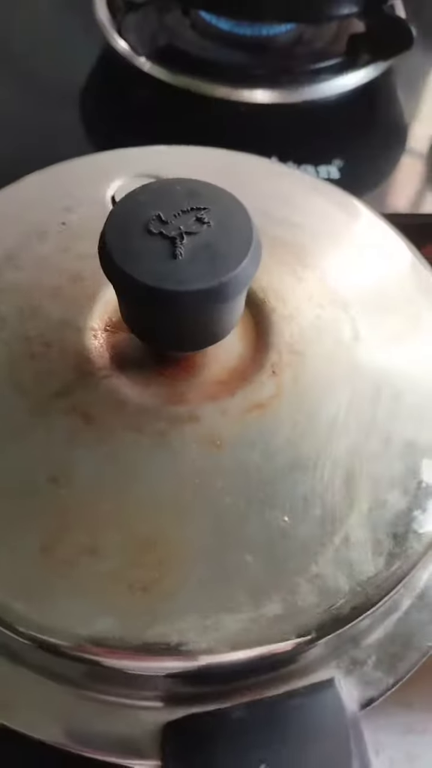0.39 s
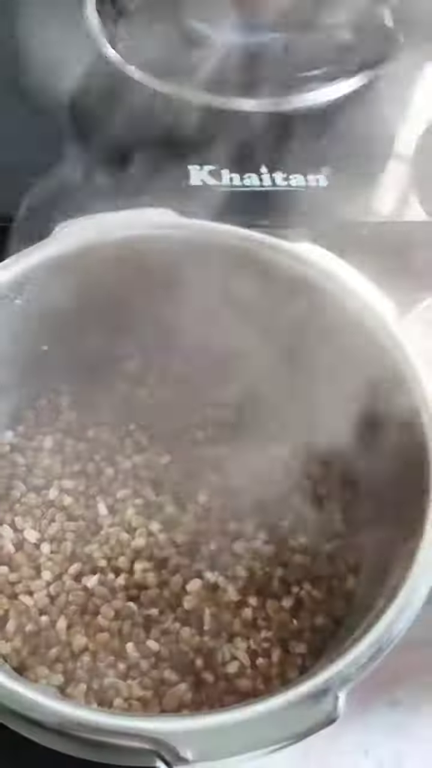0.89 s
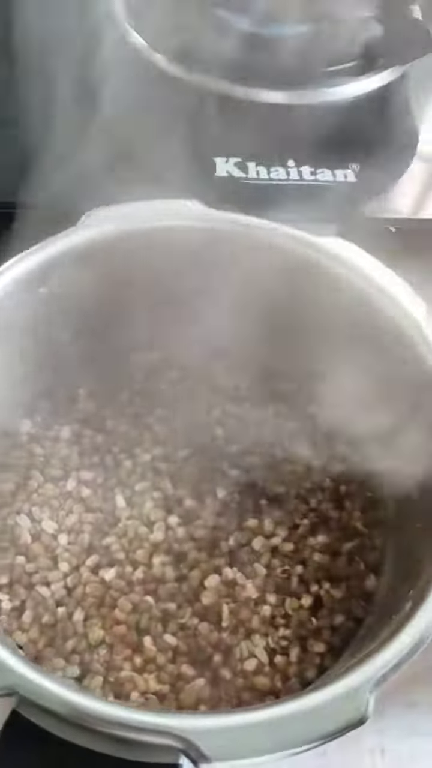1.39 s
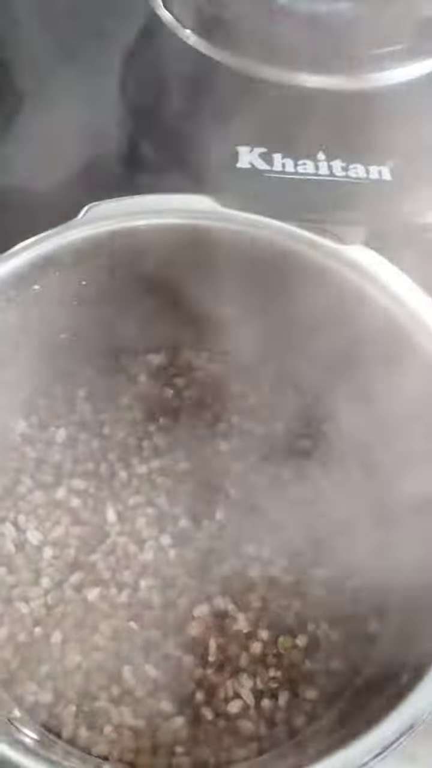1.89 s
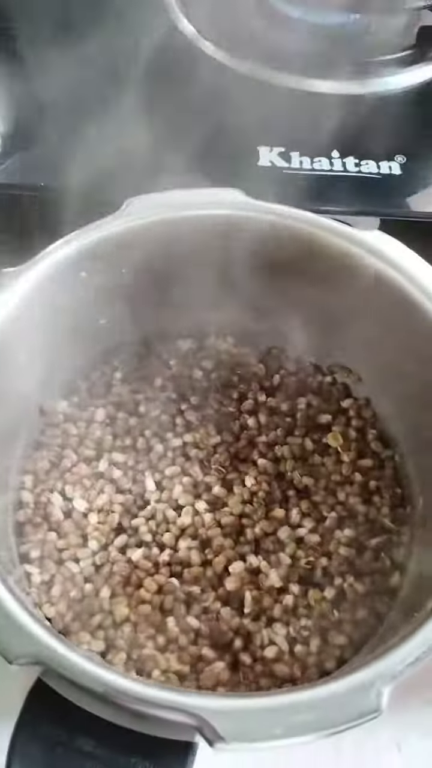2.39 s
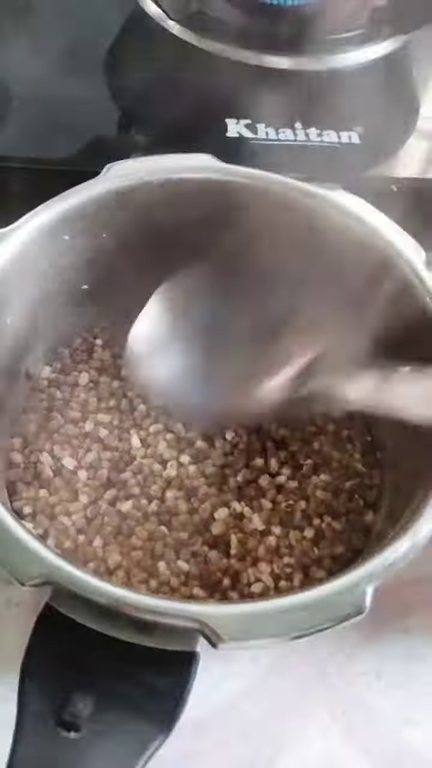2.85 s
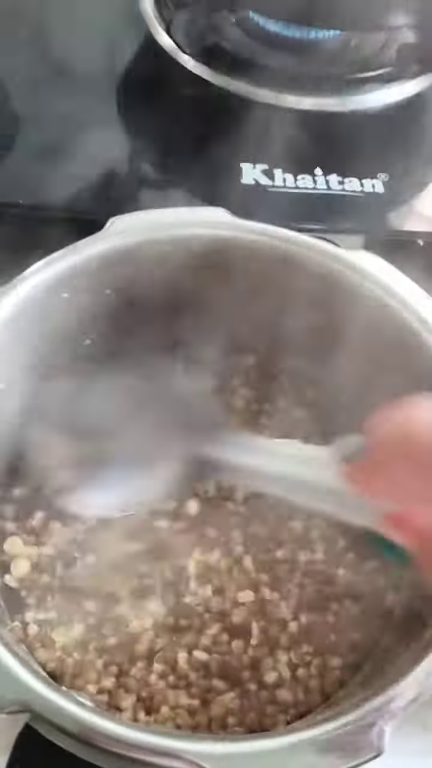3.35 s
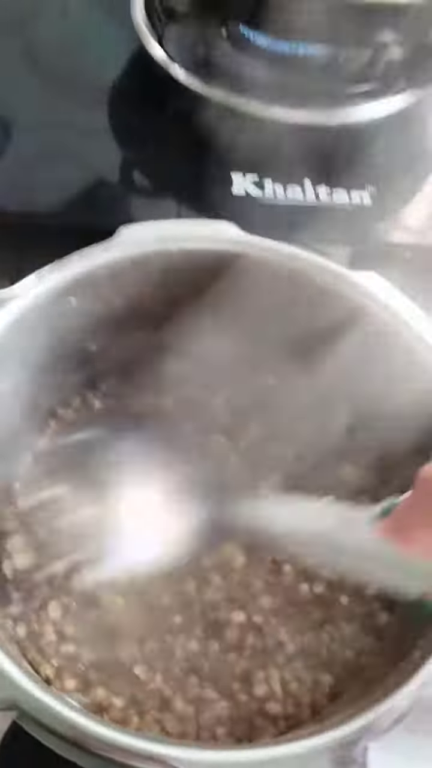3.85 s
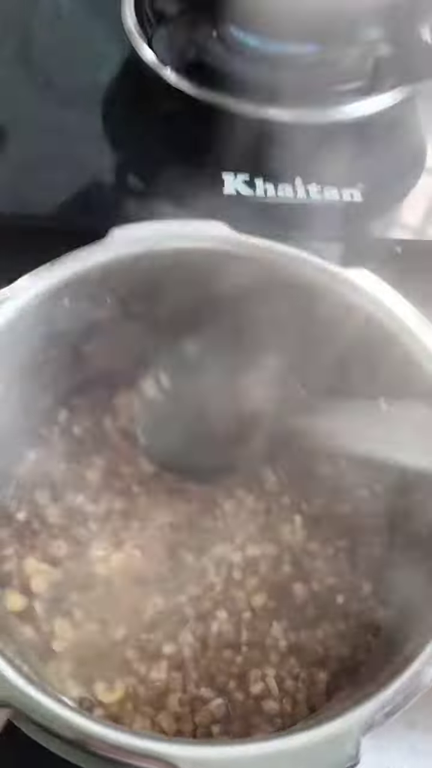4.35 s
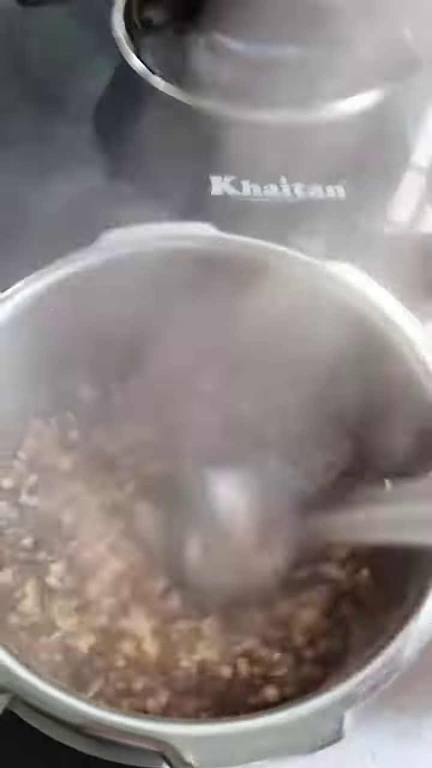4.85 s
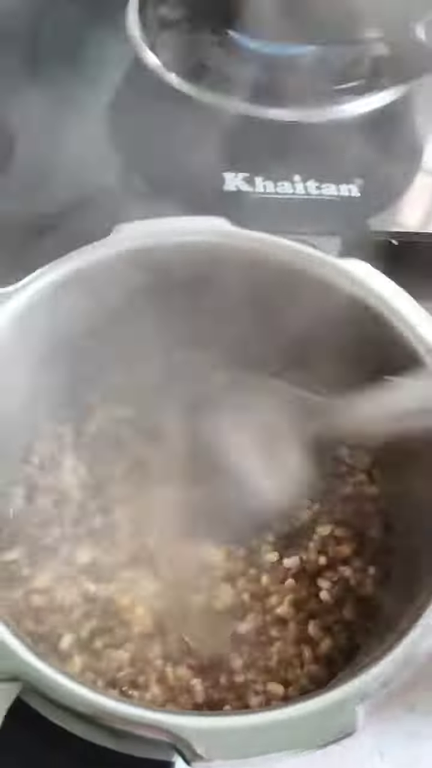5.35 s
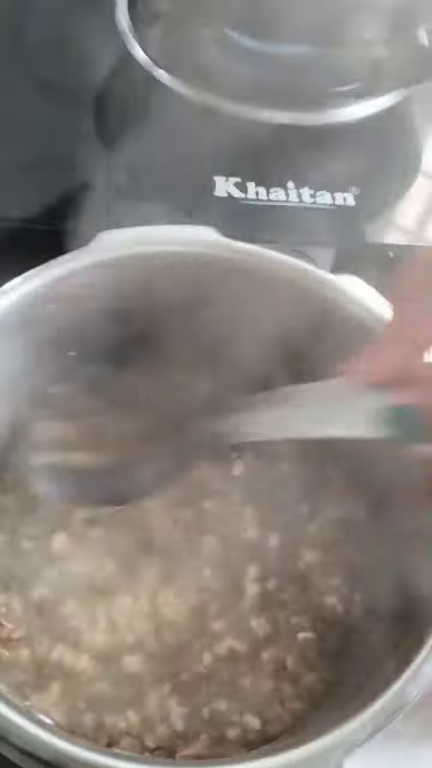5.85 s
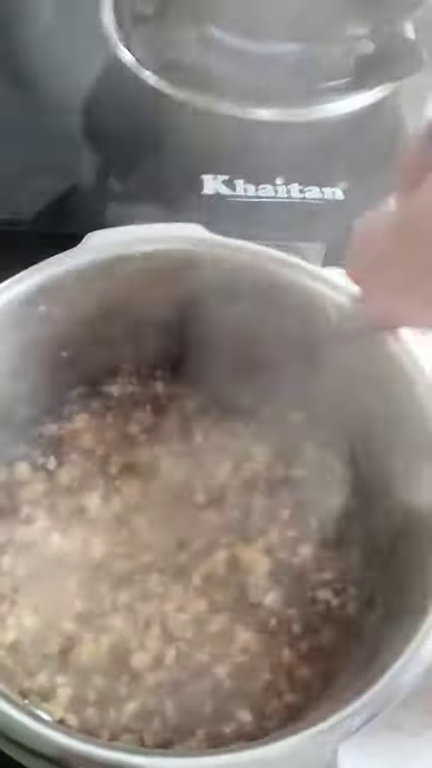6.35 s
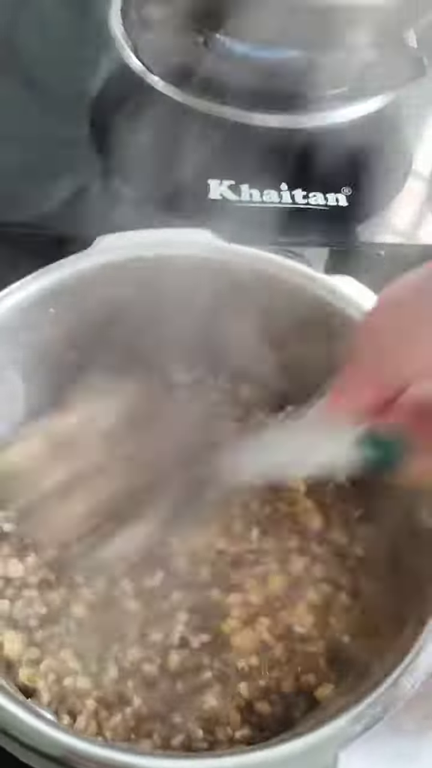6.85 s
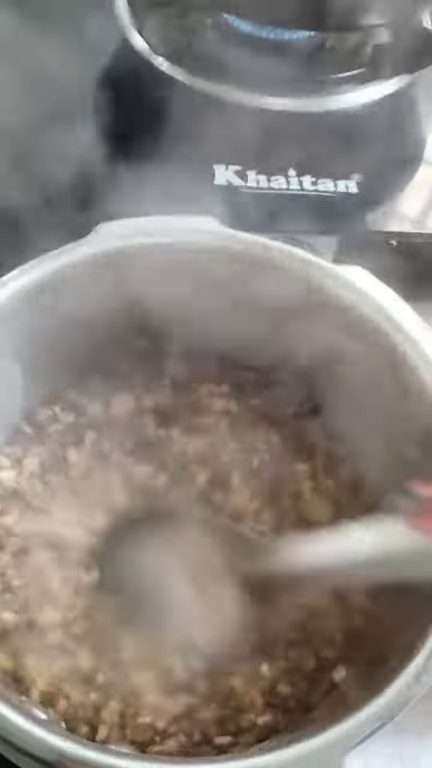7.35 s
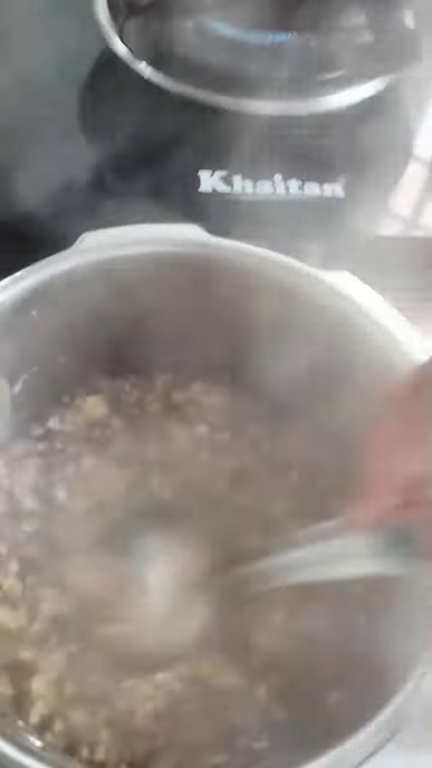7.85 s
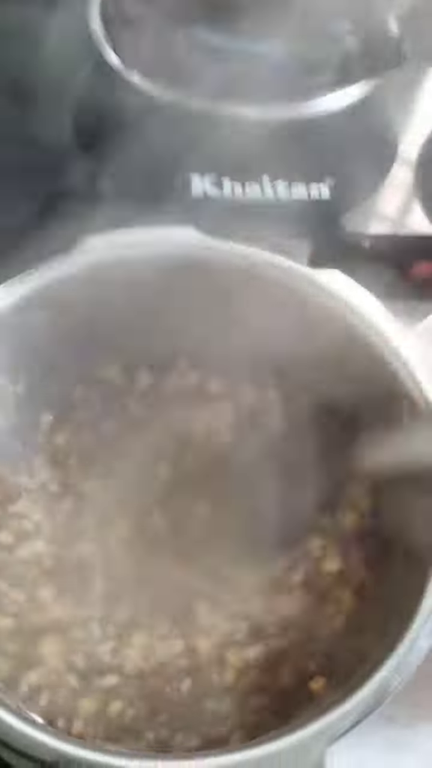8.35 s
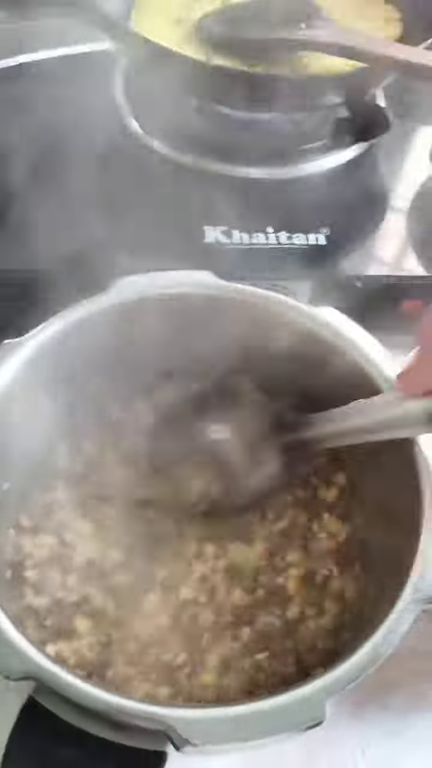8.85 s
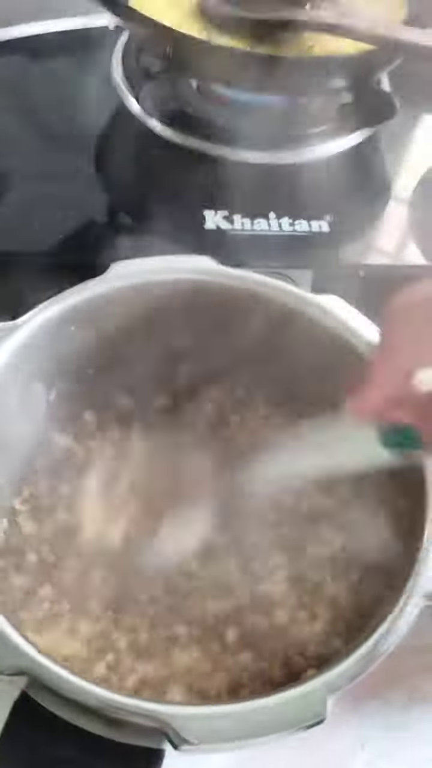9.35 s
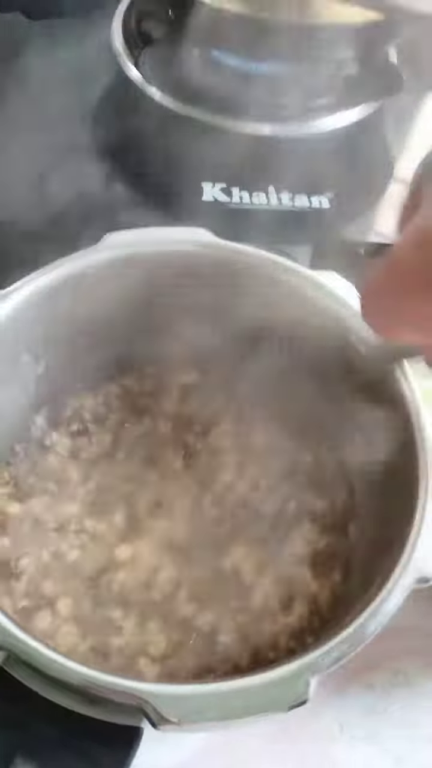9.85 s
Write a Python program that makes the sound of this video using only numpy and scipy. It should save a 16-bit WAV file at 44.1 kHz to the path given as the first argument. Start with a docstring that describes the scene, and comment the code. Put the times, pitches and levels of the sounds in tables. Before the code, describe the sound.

A short thin steam jet stops almost at once, followed by dull bumps and a bright clatter of a steel lid being unlocked, lifted and put down. Then a ladle stirs beans, striking the pot wall in irregular short metallic knocks, with tiny ticks between. Close microphone in a small kitchen, with soft steam hiss and low burner rumble behind.

```python
"""Pressure cooker of beans, opened and stirred

A steam jet, as banded noise, vents briefly from a cooker; its steel lid is unlocked, lifted and set down with clanks.
Then a steel ladle stirs hot beans and knocks on the pot wall: each blow is briefly ringing modes over noise clatter.
Scrapes, ticks and dull bumps are short shaped noises, the bumps with a low swing. Behind them lie the roar,
scrape and hiss of the kitchen as drifting coloured noise, and the rumble of burners with one deep tone."""
import sys
import numpy as np
from scipy import signal
from scipy.fft import rfft, irfft
from scipy.io import wavfile
from scipy.ndimage import uniform_filter1d

SR = 44100
rng = np.random.default_rng(int(sys.argv[2]) if len(sys.argv) > 2 else 0)


def persist_wave(psi):
    """Save psi, clipped to +-1, as 16-bit WAV."""
    counts = np.round(np.clip(psi, -1, 1) * 32767).astype(np.int16)
    wavfile.write(sys.argv[1], SR, np.atleast_2d(counts).T)


def convert_level_to_amplitude(level_db):
    """Map a level in decibels to its linear amplitude factor."""
    exponent = np.asarray(level_db, float) / 20
    return 10 ** exponent


N = 440118

# Modes of the lid. Each row: frequency in Hz, relative level in dB, t60 in s before capping and scaling per blow.
LID_MODES = [(807, -20, 5.0), (1270, -7, 0.072), (1685, -14, 0.073), (2159, -25, 0.092), (2982, -28, 0.21),
             (3359, -20, 0.13), (3892, -25, 0.11), (4161, -17, 0.081), (4544, -25, 0.2), (5620, -30, 0.1),
             (6535, -20, 0.066), (7036, -9, 0.058), (7843, -18, 0.11), (8463, -20, 0.054),
             (8899, -22, 0.074), (9200, -25, 0.072), (9873, -10, 0.053), (10010, -8, 0.05),
             (10540, -16, 0.061), (10860, 0, 0.021), (11260, -15, 0.018), (11690, -25, 0.07),
             (11950, -15, 0.046), (12280, -20, 0.084), (12380, -21, 0.075), (12730, -20, 0.085)]
# Spectrum of the lid's clatter. Each row: frequency in Hz, relative density in dB.
LID_CLATTER = [(88, -41.5), (150, -14), (459, -11), (757, -0.5), (1300, -3.5), (2310, -10), (3400, -16),
               (5950, -16), (6810, -9), (8920, -14), (10200, -28), (14200, -15.5), (15000, -39)]
# Body, middle, treble. Each row: centre in Hz, t60 of the clatter in s before scaling per blow.
BANDS = [(900, 0.04), (3500, 0.027), (9000, 0.032)]


def unit_rms(x):
    return x / np.sqrt(np.mean(x ** 2) + 1e-20)


def read_curve(points, hz):
    """Interpolates a curve over log frequency."""
    f, value = np.transpose(points)
    return np.interp(np.log(hz + 1), np.log(f + 1), value)


def band_share(hz, band):
    """Gain of one of the three overlapping bands at each frequency."""
    corners = [(f, float(k == band)) for k, (f, _) in enumerate(BANDS)]
    return read_curve(corners, hz) ** 1.717


def coloured(noise, gain):
    """Noise filtered by a gain per FFT bin, at unit rms."""
    return unit_rms(irfft(rfft(noise) * gain, len(noise)))


def add(mix, start_s, sound):
    part = mix[round(start_s * SR):][:len(sound)]
    part += sound[:len(part)]


def struck_steel(rows, modes, clatter, decay_scale, ring_db, ring_per_hard, rise_s, crack_db,
                 upper_ring_db, twin_db, favour_db, spot_db, gather_db):
    """Each blow rings the modes, unevenly by where it lands, over a crack and a clatter of unresolved modes."""
    longest_t60_s = 0.075  # hand and food damp longer rings; capped ahead of the scaling per blow
    longer_per_db = 0.012  # louder blows ring longer
    out, t, bins = np.zeros(N), np.arange(6144) / SR, np.fft.rfftfreq(6144, 1 / SR)
    hz, mode_db, t60_s = np.transpose(modes)[:, :, None]
    rise = 1 - np.exp(-t / rise_s)
    crack = convert_level_to_amplitude(crack_db - 60 * t / 0.01)
    high_pass = bins ** 2 / (bins ** 2 + 147.0 ** 2)
    for s, db, body_db, treble_db, best_hz in rows:
        scale = decay_scale * np.exp(longer_per_db * (db + 27))
        place = rng.standard_normal((3, len(modes), 1))
        noise = rng.standard_normal(len(t))

        # an uneven vessel splits each mode in two
        phase = 2 * np.pi * hz * (1 + 0.0073 * place[1]) * t
        pair = np.sin(phase) + convert_level_to_amplitude(twin_db) * np.sin(phase * (1 + 0.018 * place[2]))
        place_db = 3.5 * place[0]
        place_db += favour_db * np.exp(-(np.log2(hz / best_hz) / 0.045) ** 2)
        ring_t60_s = np.minimum(t60_s, longest_t60_s) * np.sqrt(scale)
        ring = convert_level_to_amplitude(mode_db + place_db - 60 * t / ring_t60_s) * pair

        # clatter gathers round the modes and the spot's best frequency
        spot = spot_db * np.exp(-(np.log2((bins + 1) / best_hz) / 0.04) ** 2)
        near_modes = convert_level_to_amplitude(0.5 * (mode_db + place_db)) / (1 + ((bins - hz) / (0.011 * hz)) ** 2)
        colour = convert_level_to_amplitude(read_curve(clatter, bins) + spot)
        colour *= (1 + convert_level_to_amplitude(gather_db) * near_modes.sum(0)) * high_pass

        tones = [(body_db, 0), (0, upper_ring_db), (treble_db, upper_ring_db)]
        for band, (band_db, tone_db) in enumerate(tones):
            dense = coloured(noise, colour * band_share(bins, band))
            dense *= crack + convert_level_to_amplitude(-60 * t / (BANDS[band][1] * scale))
            lines = (band_share(hz, band) * ring).sum(0)
            lines_gain = convert_level_to_amplitude(ring_db + ring_per_hard * treble_db + tone_db)
            part = rise * (dense + lines_gain * lines / np.std(lines[:200]))
            add(out, s - rise_s, convert_level_to_amplitude(db + band_db) * part / np.std(part[:200]))
    return out


def lid():
    """Lid against rim and counter: the treble of hard blows rings much more, over a strong crack."""
    # Each row: time in s, onset level of the middle band in dB, body re middle in dB (weight),
    # treble re middle in dB (hardness), frequency that this spot rings best in Hz.
    blows = [(0.7869, -25.5, -5.5, -7.5, 4530), (0.8039, -38.5, 8, -16, 1990), (1.405, -40.5, -2, -5, 4200),
             (1.4105, -40.5, 5, 7, 7700), (1.4144, -28.5, 7.5, 1.5, 7460), (1.4224, -39, 3, -6, 4200),
             (1.713, -33, 10.5, -20, 1850), (1.8104, -30, 2.5, 8, 2720), (1.8159, -19, 3, 8, 10160),
             (1.8294, -28, 5.5, -2, 7300), (1.902, -39.5, 14.5, 6.5, 7850),
             (2.0036, -22.5, -3, -11.5, 3080), (2.023, -42.5, 15, -20, 2560), (2.3725, -51, 4, -12, 2340),
             (2.4377, -30.5, -5.5, 11.5, 8060), (2.4441, -31, -17, 6, 10100), (2.5014, -36, -4.5, 10, 8030),
             (2.5425, -34, 3.5, -9, 2240)]
    return struck_steel(blows, LID_MODES, LID_CLATTER, decay_scale=1.9, ring_db=-14.5, ring_per_hard=0.7,
                        rise_s=0.00073, crack_db=10.0, upper_ring_db=2.0, twin_db=6.0, favour_db=4.0,
                        spot_db=12.5, gather_db=20.0)


def ladle():
    """Ladle against the pot wall: stronger modes than the lid's over a weaker crack."""
    # Each row: time in s, onset level of the middle band in dB, body re middle in dB (weight),
    # treble re middle in dB (hardness), frequency that this spot rings best in Hz.
    blows = [(3.4665, -24, 2.5, 0.5, 4460), (3.6302, -28.5, 7.5, -3.5, 1850),
             (3.9768, -14.5, -3.5, -3, 5400), (4.0347, -52.5, 8, -6, 2090), (4.2999, -25.5, 1.5, 7, 4120),
             (4.4511, -32, 6.5, -8, 1760), (5.301, -17, 3.5, -0.5, 1130), (5.939, -25, -0.5, -3, 5230),
             (6.1151, -19.5, -4.5, 2.5, 1930), (6.3882, -26.5, 2.5, -9.5, 5300),
             (7.0881, -24, -3.5, 0, 5270), (7.3972, -46.5, -28, 9.5, 5200), (7.4074, -36.5, -2, 6, 8400),
             (7.6923, -16.5, 2, 2, 5730), (7.7214, -34.5, -5, -2, 4140), (7.877, -34, -17, -5.5, 2230),
             (8.0133, -32, 8.5, -3.5, 5470), (8.0928, -38, -2.5, -1, 2580), (8.6493, -20, -12, -2.5, 4970),
             (8.8057, -55.5, -20, 19, 8100), (8.9628, -57, -20, 17.5, 12000), (8.9883, -47, 0, 5, 2040),
             (9.7599, -20.5, -7, -4.5, 4430), (9.7784, -45.5, -14, 2, 3240), (9.9408, -47.5, -3, 2, 4200)]
    # Each row: frequency in Hz, relative level in dB, t60 in s before capping and scaling per blow.
    pot_modes = [(398, -15, 0.088), (738, -20, 0.087), (1130, 0, 0.07), (1567, -17, 0.072),
                 (1760, -17, 0.069), (1938, -13, 0.055), (2579, -19, 0.058), (3219, -17, 0.1),
                 (3736, -23, 0.099), (4597, -9, 0.059), (4974, -4, 0.032), (5152, -7, 0.043),
                 (5620, -22, 0.048), (5895, -18, 0.041), (6401, -13, 0.044), (6578, -12, 0.053),
                 (7316, -13, 0.035), (7870, -14, 0.056), (8716, -5, 0.031), (8995, -23, 0.16),
                 (10210, -23, 0.071), (11120, -29, 0.089), (12140, -26, 0.042)]
    # Each row: frequency in Hz, relative density in dB.
    pot_clatter = [(88, -51), (150, -18), (728, -11.5), (1110, -8.5), (1700, -16), (2230, -4.5),
                   (2650, -14), (3270, -14.5), (5200, -15), (5720, -12), (8580, -4.5), (13400, -16.5),
                   (15000, -37)]
    return struck_steel(blows, pot_modes, pot_clatter, decay_scale=1.26, ring_db=-2.5, ring_per_hard=0.05,
                        rise_s=0.0006, crack_db=1.5, upper_ring_db=-3.0, twin_db=-2.0, favour_db=10.5,
                        spot_db=9.5, gather_db=13.0)


def scrapes():
    """Rubbing contact: tapered noise of rough level, for dense tiny impacts, in the colour of the lid's steel."""
    # Lid dragged on the rim, ladle pushed through beans. Each row: start in s, length in s,
    # rms before the taper in dB, tilt in dB per octave.
    rubs = [(0.792, 0.043, -35.5, -6), (1.168, 0.12, -48, 5), (1.391, 0.022, -47, -6.5),
            (1.427, 0.062, -41, -4), (1.715, 0.041, -35, -6), (1.817, 0.072, -33.5, -3.5),
            (1.861, 0.075, -37.5, -6.5), (2.007, 0.036, -39, -6.5), (2.361, 0.052, -42, -5),
            (6.571, 0.12, -52, -5), (8.546, 0.038, -53, -2.5), (8.268, 0.11, -53, 10)]
    out = np.zeros(N)
    for s, length_s, db, tilt_db in rubs:
        count = round(length_s * SR)
        bins = np.fft.rfftfreq(count, 1 / SR) + 1
        roughness = unit_rms(uniform_filter1d(rng.standard_normal(count), size=150))
        impacts = rng.standard_normal(count) * convert_level_to_amplitude(2.2 * roughness)
        colour = convert_level_to_amplitude(read_curve(LID_CLATTER, bins) + tilt_db * np.log2(bins / 1000))
        # broad peaks at the modes
        colour *= 1 + 0.83 * sum(1 / (1 + ((bins - hz) / (0.075 * hz)) ** 2) for hz, _, _ in LID_MODES)
        add(out, s, convert_level_to_amplitude(db) * coloured(impacts, colour) * signal.windows.tukey(count, 0.6))
    return out


def vent():
    """Steam jet past the weight: noise in a few whistling bands, fluttering until it stops."""
    # Each row: centre in Hz, -3 dB width in Hz (below 250 counts as 250), relative level in dB.
    whistles = [(7400, 230, 9), (7890, 32, 12), (9180, 130, -4), (11100, 98, -1), (13200, 180, 9)]
    level_db, end_s = -49.5, 0.243
    count = round(end_s * SR)
    hz = np.fft.rfftfreq(count, 1 / SR)
    peaks = sum(convert_level_to_amplitude(db) / np.sqrt(1 + (2 * (hz - f) / max(width, 250)) ** 2) for f, width, db in whistles)
    high_pass = hz ** 4 / (hz ** 4 + 3200.0 ** 4)
    flutter = convert_level_to_amplitude(1.3 * unit_rms(uniform_filter1d(rng.standard_normal(count), size=600)))
    jet = coloured(rng.standard_normal(count), peaks * high_pass) * flutter
    return np.pad(convert_level_to_amplitude(level_db) * jet, (0, N - count))


def ticks():
    """Droplets, beans and light touches of steel: a dry noise spike with a faint, unpitched tail."""
    # Each row: time in s, level in dB, spectral width (standard deviation) in octaves.
    clear = [(0.0276, -24, .54), (0.042, -31, 1.1), (0.8768, -30, 1.2), (0.976, -31, 0.69),
             (0.983, -27, 1.2), (0.99, -30, 1.7), (1.043, -25.5, 0.21), (1.05, -32, .53),
             (1.186, -30.5, 1.1), (1.1957, -32, 0.6), (1.239, -22.5, 1.25), (1.2604, -28, 0.5),
             (1.693, -32, 2.2), (2.6888, -34.5, 0.6), (3.123, -34.5, .67), (3.328, -35.5, 2.3),
             (3.514, -25.5, 0.48), (3.726, -34, 0.39), (3.968, -34, .8), (3.822, -26, 1.2),
             (4.151, -34, 1.1), (4.198, -30.5, 1.3), (4.6424, -26.5, 3), (4.8258, -23, 1.45),
             (4.985, -32, 0.91), (5.1464, -35.5, 3.1), (5.267, -37, 0.75), (5.4414, -19.5, 0.49),
             (5.594, -27, .37), (5.6355, -31, 1.2), (5.7987, -28, 0.66), (6.273, -34.5, 2),
             (6.557, -28, 1.5), (6.5827, -30.5, 0.38), (6.656, -34, 1.1), (6.957, -33.5, 1),
             (7.2496, -26, 2.6), (7.8125, -33, 0.42), (7.939, -24.5, 0.56), (8.175, -33, 0.98),
             (8.298, -28.5, 0.75), (8.31, -33, 1), (8.337, -19, 0.55), (8.7186, -31.5, .88),
             (9.4537, -23, 0.69)]
    centre_hz, centre_scatter, tail_t60_s = 9200, 0.024, 0.035
    faint_count, faint_db, faint_octaves = 16, -41.5, 1.4  # at random moments, up to 4 dB above faint_db
    out, t = np.zeros(N), np.arange(4096) / SR
    bins = np.fft.rfftfreq(len(t), 1 / SR) + 1
    low_pass = 1 / np.sqrt(1 + (bins / 10500) ** 6)
    spike, tail = convert_level_to_amplitude(-60 * t / 0.0037), convert_level_to_amplitude(-14.5 - 60 * t / tail_t60_s)
    shape = (spike + tail) * (1 - np.exp(-t / 0.00082))
    faint = [(u * N / SR, faint_db + 4 * v, faint_octaves) for u, v in rng.random((faint_count, 2))]
    for s, db, octaves in clear + faint:
        hz = centre_hz * (1 + centre_scatter * rng.standard_normal())
        hump = np.exp(-0.5 * (np.log2(bins / hz) / octaves) ** 2)
        snap = coloured(rng.standard_normal(len(t)), hump * low_pass)
        add(out, max(s - 0.0006, 0), convert_level_to_amplitude(db) * shape * snap)
    return out


def bumps():
    """Dull bumps through stove and counter: a low damped swing with a short, dull noise rustle."""
    # Each row: time in s, level in dB, frequency in Hz, t60 in s, rustle re swing in dB.
    thuds = [(0.524, -34.5, 288, 0.052, -1.5), (0.574, -40, 410, 0.057, -2.5), (0.612, -44, 127, 0.067, 1),
             (0.628, -33, 244, 0.072, -2), (1.413, -26, 118, 0.13, -10), (1.449, -28, 102, 0.074, 0.5),
             (2.371, -34, 370, 0.087, 4.5), (3.165, -38.5, 87.5, 0.11, -10),
             (4.273, -28.5, 137, 0.064, -17), (6.175, -17.5, 133, 0.1, -2), (6.3, -36, 148, 0.061, -1),
             (6.486, -41, 316, 0.045, 8), (6.565, -44.5, 191, 0.13, 4.5), (7.675, -46, 460, 0.068, 2),
             (9.677, -35.5, 160, 0.059, 0.5)]
    out, t = np.zeros(N), np.arange(8192) / SR
    low_pass = 1 / (1 + (np.fft.rfftfreq(len(t), 1 / SR) / 900) ** 3.03)
    for s, db, hz, t60_s, rustle_db in thuds:
        rustle = convert_level_to_amplitude(rustle_db - 60 * t / 0.4) * coloured(rng.standard_normal(len(t)), low_pass)
        swing = np.sin(2 * np.pi * hz * t)
        shape = convert_level_to_amplitude(db - 60 * t / t60_s) * (1 - np.exp(-t / 0.0025))
        add(out, s - 0.002, shape * (swing + rustle))
    return out


def kitchen():
    """Roar, scrape and hiss share one noise spectrum and swell apart, roughened by patches and droplet bursts."""
    # Each row: time in s, bustle of lid and ladle in dB, steam rising from the pot in dB.
    activity = [(0.0, -1.5, 3), (0.08, -1.5, 7), (0.3, -1.5, 2), (0.83, 2.5, -2), (1.1, -1, 1),
                (1.7, 1.5, -1), (1.89, 7, -2), (2.05, 0, 3), (2.75, 0, -1), (4.399, 0.7, -1), (5.2, -.5, 0),
                (5.39, 1.5, 0.3), (5.9, 0.5, -2.5), (6.48, 2.5, 2.5), (6.899, -0.5, -2), (7.9, 0.8, 1),
                (8.1, -1.5, 0), (8.7, 1.5, 0.1), (9.8, -0.9, 0.2), (9.98, 3, 4)]
    # Each row: frequency in Hz, relative density in dB.
    air = [(120, -49.5), (200, 4), (309, -8.5), (370, -6.5), (419, -9.5), (494, -3.5), (602, -13),
           (998, -9.5), (1410, -11), (1600, -12.5), (3010, -24), (5660, -21), (8410, -13), (13700, -27.5),
           (15000, -37.5)]
    # Roar, scrape, hiss. Each row: resting level in dB, share of the bustle, share of the steam.
    layers = [(-55.5, .99, 0.01), (-67, 0.69, .3), (-61, .1, .99)]
    swell_db = 0.97  # rms of each layer's chance drift
    frames, hz = N // 128 + 5, np.fft.rfftfreq(512, 1 / SR)
    real, imag, patches = rng.standard_normal((frames, len(hz), 3)).T
    patches = unit_rms(uniform_filter1d(uniform_filter1d(patches, size=8, axis=0), size=14, axis=1))
    bursts = np.minimum(rng.exponential(1, frames), 4) * (rng.random(frames) < 0.06)  # droplets
    # beans shifting in clumps
    rolls = unit_rms(uniform_filter1d(np.minimum(rng.exponential(1, frames), 3) ** 2, size=9))
    patches += 0.6 * rolls * ((hz > 700) & (hz < 2500))[:, None]
    texture_db = 2.27 * patches + 2.5 * bursts * (hz > 2500)[:, None]
    z = (real + 1j * imag) * convert_level_to_amplitude(read_curve(air, hz)[:, None] + texture_db)
    s, bustle_db, steam_db = np.transpose(activity)
    out = np.zeros(N)
    for band, (db, busy, steamy) in enumerate(layers):
        drift = uniform_filter1d(uniform_filter1d(rng.standard_normal(frames), size=50), size=50)
        gain = band_share(hz, band)[:, None] * convert_level_to_amplitude(swell_db * unit_rms(drift))
        part = signal.istft(z * gain, nperseg=512, noverlap=384)[1][:N]
        course_db = np.interp(np.arange(N) / SR, s, busy * bustle_db + steamy * steam_db)
        out += convert_level_to_amplitude(db + course_db) * unit_rms(part)
    return out


def rumble():
    """Low noise drone of burners and house, with one steady deep sine."""
    # Each row: frequency in Hz, relative density in dB.
    drone_curve = [(8.8, -43.5), (15, 2), (48, -2.5), (75, -3), (124, -7), (161, -8.5), (200, -11),
                   (260, -38), (440, -120)]
    # Each row: frequency in Hz, rms in dB.
    deep_tone = [(26.9, -64)]
    drone_db = -56
    gain = convert_level_to_amplitude(read_curve(drone_curve, np.fft.rfftfreq(N, 1 / SR)))
    drone = coloured(rng.standard_normal(N), gain)
    t = np.arange(N) / SR
    tone = sum(convert_level_to_amplitude(db) * np.sqrt(2) * np.sin(2 * np.pi * hz * t) for hz, db in deep_tone)
    return convert_level_to_amplitude(drone_db) * drone + tone


def with_side_noise(x, less_db):
    """Stereo from mono: a side signal of scrambled phase, mostly treble."""
    # Each row: frequency in Hz, side re mid in dB before less_db is taken off.
    spread = [(3000, -70.5), (4400, -16.5), (8000, -7), (14900, -9)]
    hz, _, z = signal.stft(x, SR, nperseg=256)
    phase = 2 * np.pi * rng.random(z.shape[::-1]).T
    z *= convert_level_to_amplitude(read_curve(spread, hz) - less_db)[:, None] * np.exp(1j * phase)
    side = signal.istft(z, SR, nperseg=256)[1][:N]
    return np.array([x + side, x - side])


def scene():
    """Every source stays at the centre, with a faint side noise in the treble; it is weaker for the contacts
    than for the steady sounds and ticks."""
    contacts = lid() + ladle() + scrapes() + bumps()
    steady = vent() + ticks() + kitchen() + rumble()
    return with_side_noise(contacts, less_db=13.5) + with_side_noise(steady, less_db=-5.0)


def band_limit(x):
    """A steep low-pass at the top of the band."""
    return signal.sosfilt(signal.butter(12, 15480, fs=SR, output="sos"), x)


def record(dry):
    """Soft overload of the loudest peaks, then a low-pass at 14.4 kHz."""
    soft = dry / (1 + (dry / 0.86) ** 4) ** 0.25
    low_pass = signal.firwin(255, 14400.0, window=("kaiser", 6), fs=SR)[None]
    return band_limit(signal.oaconvolve(soft, low_pass, "same"))


dry = scene()
out = record(dry)
persist_wave(out)
```